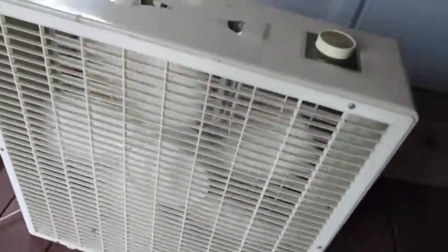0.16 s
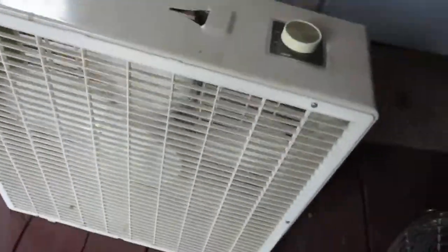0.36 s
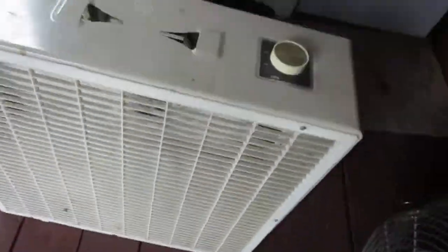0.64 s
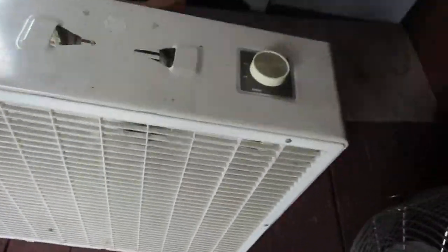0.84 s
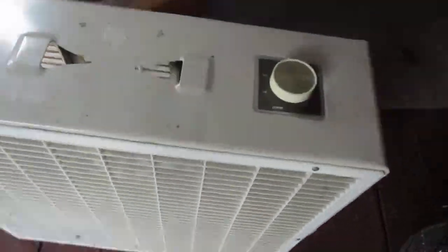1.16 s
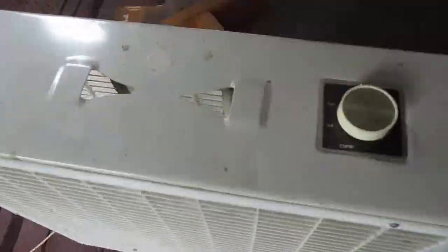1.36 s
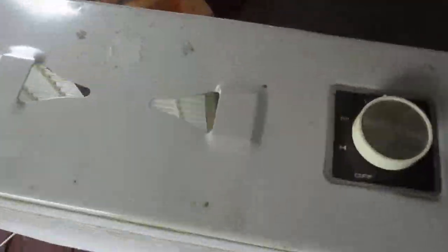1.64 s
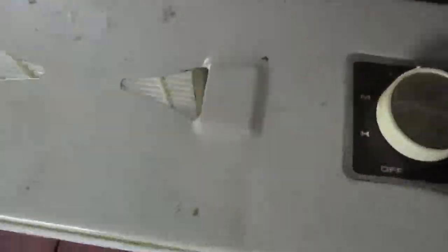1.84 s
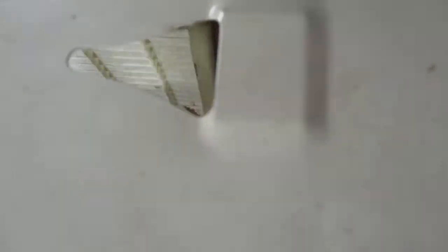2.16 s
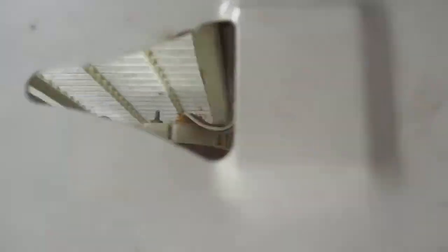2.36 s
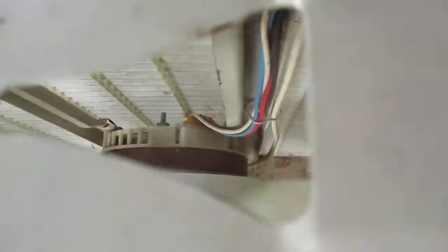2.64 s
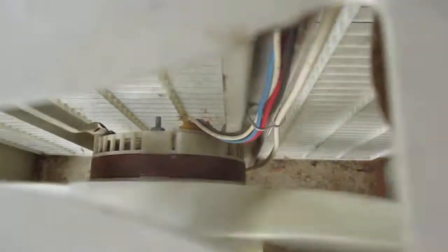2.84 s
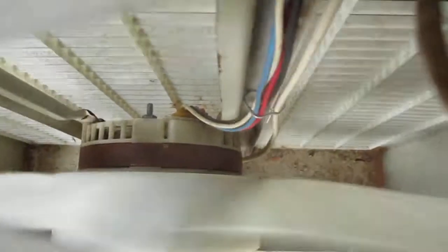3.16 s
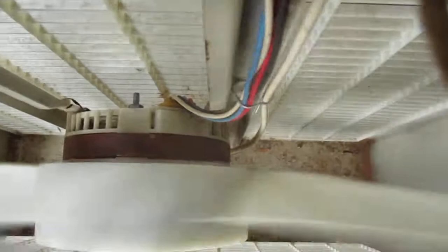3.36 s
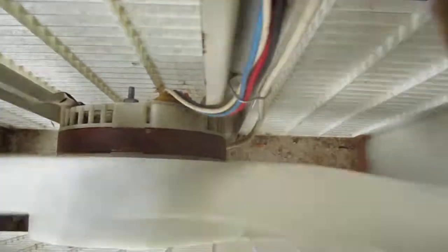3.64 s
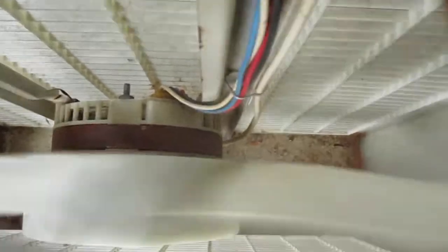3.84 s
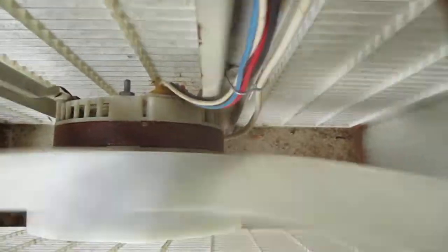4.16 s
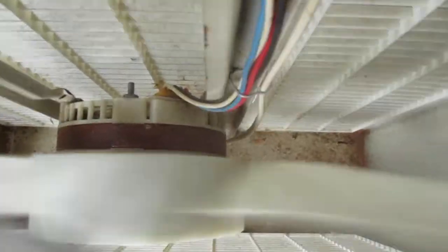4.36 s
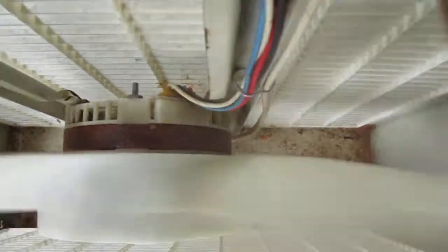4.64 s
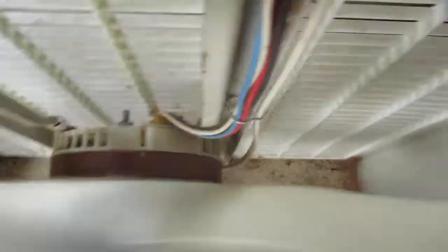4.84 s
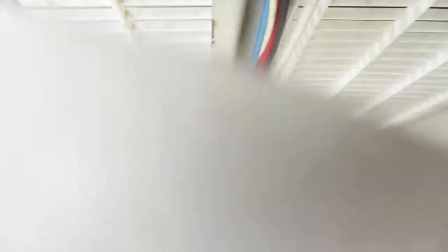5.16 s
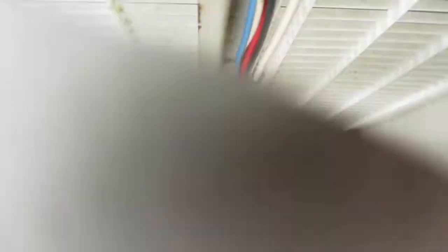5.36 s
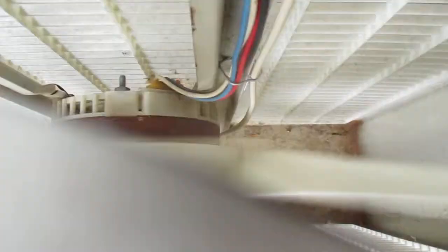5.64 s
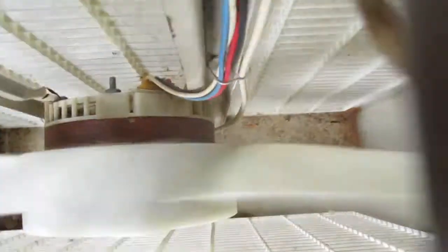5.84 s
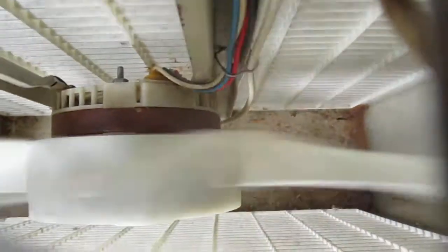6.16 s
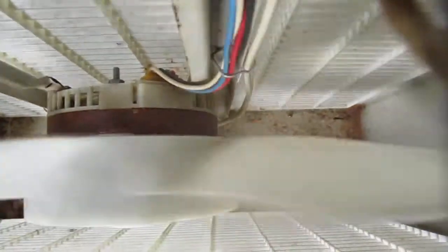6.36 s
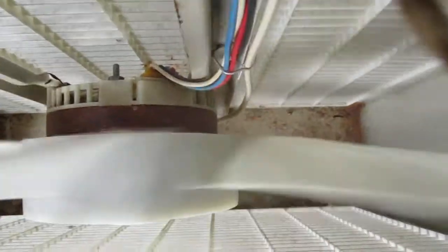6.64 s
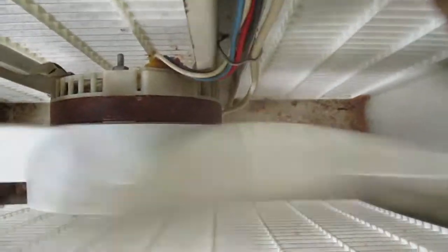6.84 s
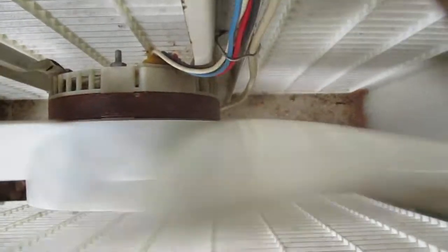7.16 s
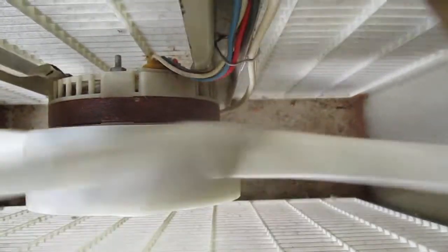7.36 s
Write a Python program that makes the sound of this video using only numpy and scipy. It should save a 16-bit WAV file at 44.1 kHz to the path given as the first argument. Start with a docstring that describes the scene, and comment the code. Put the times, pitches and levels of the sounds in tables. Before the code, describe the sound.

A box fan's buzzing hum swells as it nears, then cuts to a fading whir with light clicks and soft knocks.

```python
"""Box fan, switched off

A five-blade box fan runs indoors as a hand-held camera closes in on a handle slot in its steel case.
Mains hum beats against the blade tones, over air chopped by the blades. A hand brushes past and
switches it off: the hum stops and the rotor coasts down, with light clicks, rubs and a few knocks."""
import sys
import numpy as np
from scipy import signal
from scipy.fft import rfft, irfft, next_fast_len
from scipy.io import wavfile
from scipy.ndimage import map_coordinates

SR = 44100
rng = np.random.default_rng(int(sys.argv[2]) if len(sys.argv) > 2 else 0)


def to_wav(s):
    """Save 16-bit WAV."""
    ch = np.atleast_2d(s).T  # columns
    pcm = np.round(np.clip(ch, -1, 1) * 32767)  # PCM
    wavfile.write(sys.argv[1], SR, pcm.astype(np.int16))


N = 330309
TIME_S = np.arange(N) / SR
BLADES, FULL_PASS_HZ, MAINS_HZ, OFF_S = 5, 55.76, 60, 4.87
CLICK_LEAD_S = 0.004


def amp(db):
    """Decibels to gain."""
    return 10 ** (np.asarray(db) / 20)


def unit(x):
    """Scale to rms 1."""
    return x / np.sqrt(np.mean(x ** 2) + 1e-20)


def wobble(rate_hz):
    """Smooth random curve through Gaussian knots."""
    knots = rng.standard_normal(int(N * rate_hz / SR) + 4)
    return map_coordinates(knots, [TIME_S * rate_hz])


def filtered(x, response):
    """Apply a frequency response by FFT."""
    size = next_fast_len(len(x) + 8192)
    return irfft(rfft(x, size) * response(np.fft.rfftfreq(size, 1 / SR)), size)[:len(x)]


def resonance(f, hz, width_hz):
    """Causal resonance, gain 1 at its centre."""
    return 1j * f * width_hz / (hz * hz - f * f + 1j * f * width_hz)


def noise(spectrum):
    """Noise of rms 1, shaped by rows of f/Hz, level/dB."""
    hz, db = np.transpose(spectrum)
    colour = lambda f: amp(np.interp(np.log(f + 1), np.log(hz), db))
    return unit(filtered(rng.standard_normal(N), colour))


def add(track, start_s, sound):
    """Mix a sound into the track."""
    part = track[round(start_s * SR):][:len(sound)]
    part += sound[:len(part)]


def nearness(reach_cm, falloff):
    """Gain: 1 at the slot, a power law of distance beyond the reach."""
    # camera's path to the slot: t/s, distance/cm
    approach = [(0, 64), (.4, 61), (.85, 39), (1.45, 29.8), (2.1, 9.7), (2.4, 5.5), (2.9, 3.4), (3.4, 1.34),
                (4.5, 1.5)]
    distance_cm = np.interp(TIME_S, *np.transpose(approach))
    return (1 + (distance_cm / reach_cm) ** 2) ** (-falloff / 2)


def envelope(start_s, attack_s, hold_s, release_s):
    """Linear rise to 1, hold, exponential decay."""
    t = TIME_S - start_s
    return np.clip(t / attack_s, 0, 1) * np.exp(-np.maximum(t - attack_s - hold_s, 0) / release_s)


def motor(blade_db, hand_pass, level_db=-16, shade_db=-7, swell_db=3.5, flutter_db=3.5, stop_s=0.062):
    """Iron hums at even mains multiples until switch-off; its overtones flutter in the airflow."""
    # magnetic hum: mains multiple, relative level/dB
    harmonics = [(2, 1), (4, -22), (6, -14.5), (8, -45), (10, -24.5)]
    phase = 2 * np.pi * MAINS_HZ * TIME_S
    hum = amp(harmonics[0][1] + 0.5 * wobble(12)) * np.sin(2 * phase)
    slot_db = 0.62 * (blade_db - blade_db.max())  # overtones come out where the blade tones do
    for k, db in harmonics[1:]:
        hum += amp(db + slot_db + flutter_db * wobble(20)) * np.sin(k * phase + 0.86 * wobble(25))
    shaded_db = shade_db * nearness(reach_cm=2.47, falloff=3.1)  # right at the slot
    gain = amp(level_db + shaded_db + swell_db * hand_pass) * nearness(reach_cm=5.45, falloff=1.08)
    powered = np.clip((OFF_S - TIME_S) / stop_s + 0.5, 0, 1)
    return np.sqrt(2) * gain * powered * hum


def rotor(balance_hz=19.9, braking_per_s=0.149):
    """Blade-pass rate in Hz: steady, then slowed by air drag and bearing friction (equal at balance_hz)."""
    coast_s = np.maximum(TIME_S - OFF_S, 0)
    return balance_hz * np.tan(np.arctan(FULL_PASS_HZ / balance_hz) - braking_per_s * coast_s)


def blades(pass_hz, phase, blade_db, uneven_db=-24, waver_db=0.8, eddy_db=3, low_cut_hz=46):
    """Each passing blade sends a pressure pulse; unequal blades add weak shaft-rate harmonics."""
    # pressure pulse: blade-pass multiple, relative level/dB
    pulse = [(1, 4.5), (2, -1.5), (3, -8), (4, -16), (5, -23), (6, -35.5)]
    mic_gain = lambda hz: 1 / np.sqrt(1 + (low_cut_hz / hz) ** 4)
    eddies = wobble(30)  # inflow eddies make a pulse taller and sharper
    tones, shaft = np.zeros((2, N))
    for k, db in pulse:
        depth_db = waver_db if k == 1 else eddy_db
        tones += amp(db + depth_db * eddies) * mic_gain(k * pass_hz) * np.cos(k * phase)
    for k in range(3, 15):
        if k % BLADES:
            gain = (0.5 + rng.random()) * mic_gain(k * pass_hz / BLADES)
            shaft += gain * np.cos(k * phase / BLADES + rng.uniform(0, 2 * np.pi))
    return np.sqrt(2) * amp(blade_db) * (tones + amp(uneven_db) * shaft)


def air(phase, speed, hand_pass, inside_db=-27, grille_db=-34.5, gust_db=-21, cavity_hz=362):
    """Turbulence follows rotor speed, swells at each blade pass, rings the case and breaks on the hand."""
    # air spectra in the case, at the grille and on the hand: f/Hz, relative level/dB
    inside_spectrum = [(15, -12.5), (35, -3), (70, 4), (130, 0.5), (250, -1), (480, -6), (700, -9.5),
                       (1250, -14), (2000, -22.5), (3200, -35.5), (6000, -44), (10000, -56), (12500, -58),
                       (16000, -63)]
    grille_spectrum = [(20, -33), (60, -23), (130, -0.5), (220, 4), (320, -5.5), (450, 0), (650, -3),
                       (900, -4.5), (1300, -7), (2000, -17), (3200, -24.5), (5000, -33), (9500, -43.5),
                       (16000, -67.5)]
    gust_spectrum = [(20, -20), (60, -2), (110, 7), (300, -1), (500, -7), (900, -8.5), (1400, -16),
                     (2500, -55), (5000, -44), (10000, -58), (16000, -73)]
    chop = np.cos(phase)
    cavity = lambda f: 1 + amp(-2) * resonance(f, cavity_hz, width_hz=45)
    inside = unit(filtered(noise(inside_spectrum), cavity)) * amp(inside_db + 0.5 * chop + wobble(15))
    inside *= nearness(reach_cm=3.4, falloff=1) * speed ** 3.9
    grille = noise(grille_spectrum) * amp(grille_db + 1.16 * chop + wobble(11))
    grille *= nearness(reach_cm=24.2, falloff=0.82) * speed ** 3.86
    gust = noise(gust_spectrum) * hand_pass * amp(gust_db + 0.5 * chop)
    return inside + grille + gust


def click(peak_db, hz, t60_s, rise_s=0.00021, snap=6, shell_hz=8900, shell_db=-5):
    """Crackle and a snap ring one broad resonance and the camera's shell; low clicks are duller."""
    t = np.arange(SR // 16) / SR - CLICK_LEAD_S
    shape = np.exp(np.minimum(t, 0) / rise_s) * amp(-60 * np.maximum(t, 0) / t60_s)
    burst = rng.standard_normal(len(t)) * shape
    burst[round(CLICK_LEAD_S * SR)] += snap
    body = lambda f: resonance(f, hz, 0.58 * hz) + amp(shell_db) * resonance(f, shell_hz, width_hz=2000)
    cutoff_hz = min(2.28 * hz, 11000)
    sound = filtered(burst, lambda f: body(f) / np.sqrt(1 + (f / cutoff_hz) ** 8))
    return amp(peak_db) * sound / np.abs(sound).max()


def handling(tick_gap_s=0.11, tick_hz=3500, scatter_db=2.5):
    """Sharp clicks, and faint irregular ticks as the grip shifts."""
    # handling clicks: t/s, peak level/dB, f/Hz, t60/s
    clicks = [(0.6379, -13, 3170, .01), (0.6712, -21, 1420, 0.015), (.721, -25, 5340, 0.0049),
              (1.115, -21, 2450, 0.01), (1.753, -21, 2000, 0.01), (1.8258, -23, 3920, 0.016),
              (2.1299, -29.5, 2970, 0.023), (3.478, -10.5, 4240, .006), (4.1157, -26, 3470, 0.035),
              (4.6486, -10, 4620, 0.024), (4.6986, -16.5, 2930, 0.023), (4.716, -16.5, 4400, .016),
              (4.9274, -19.5, 2490, .016), (5.1582, -22, 4170, 0.01), (5.2215, -29.5, 4430, .014),
              (5.3268, -17, 2600, .012), (5.4362, -19, 2300, .009), (5.518, -22.5, 4640, .022),
              (6.4122, -24, 1380, 0.0099), (6.835, -31.5, 1900, 0.018)]
    # grip shifts: start/s, end/s, typical peak level/dB
    grip_shifts = [(0.071, .34, -36), (.98, 1.08, -32), (1.783, 2.0, -34), (4.781, 4.98, -28.5)]
    out = np.zeros(N)
    for at_s, db, hz, t60_s in clicks:
        add(out, at_s - CLICK_LEAD_S, click(db, hz, t60_s))
    for start_s, end_s, db in grip_shifts:
        for at_s in np.arange(start_s + tick_gap_s / 2, end_s, tick_gap_s):
            late, strong, high = rng.standard_normal(3)
            tick = click(db + scatter_db * strong, tick_hz * np.exp(0.25 * high), t60_s=0.012)
            add(out, abs(at_s + 0.2 * tick_gap_s * late), tick)
    return out


def knocks(crack_db=3, crack_t60_s=0.035, crack_hz=3000, contact_s=0.00037, scatter_db=1.5):
    """Each knock builds over a brief contact and rings the case; soft ones lose the high modes."""
    # modes of the steel case and its air space: f/Hz, relative level/dB, t60/s
    modes = [(133, 1, 0.073), (219, -4, 0.037), (362.5, 4.5, 0.16), (399, 5, 0.065), (562, 7.5, 0.021),
             (693, 4, 0.025), (961, 2.5, 0.026), (1100, 4, 0.012), (1630, 3, 0.015), (2310, 12.5, 0.01),
             (2560, -6, 0.026), (3730, -8, .015)]
    # blows on the case: t/s, gain/dB, cutoff/Hz
    blows = [(4.827, -12.5, 500), (6.281, -21.5, 150), (6.711, -33.5, 248), (6.8975, -20, 2500),
             (6.9015, -20, 2000), (7.1998, -38.5, 1800)]
    out, t = np.zeros(N), np.arange(SR // 4) / SR
    for at_s, db, cutoff_hz in blows:
        ring = np.zeros(len(t))
        for hz, mode_db, t60_s in modes:
            struck_db = mode_db + scatter_db * rng.standard_normal()
            ring += amp(struck_db - 60 * t / t60_s) * np.sin(2 * np.pi * hz * t)
        crack = amp(crack_db - 60 * t / crack_t60_s) * rng.standard_normal(len(t))
        crack = filtered(crack, lambda f: 2 / (1 + 1j * f / crack_hz) ** 2)
        blow = (ring + crack) * (1 - np.exp(-t / contact_s))
        add(out, at_s, amp(db) * filtered(blow, lambda f: 1 / (1 + 1j * f / cutoff_hz)) / 2)
    return out


def drag(level_db=-29.5, judder_db=2.5):
    """The hand catches on the steel panel and judders along it, ever more lightly."""
    # panel friction spectrum: f/Hz, relative level/dB
    panel_spectrum = [(150, -3), (400, -8), (900, 3), (1400, 2), (2300, -4), (3500, -19), (8000, -29),
                      (16000, -53.5)]
    pressure = envelope(start_s=4.655, attack_s=0.012, hold_s=0.088, release_s=0.069)
    return amp(level_db) * pressure * unit(noise(panel_spectrum) * amp(judder_db * wobble(250)))


def rubs(grain_db=4, squeak_db=4):
    """Skin sticks and slips: each stroke is a swell of fine grains around a squeak."""
    # skin friction spectrum: f/Hz, relative level/dB
    skin_spectrum = [(200, -7), (1200, 9.5), (2500, 6.5), (4300, 0.5), (5900, -1.5), (7500, -6),
                     (9500, -7.5), (11000, -8.5), (14000, -14), (16000, -19.5)]
    # finger strokes on camera and case: centre/s, width/s, level/dB, squeak f/Hz
    strokes = [(0.668, 0.052, -52, 8500), (1.102, 0.11, -52, 9100), (1.267, 0.035, -49.5, 9200),
               (1.69, 0.026, -45.5, 8800), (1.761, .029, -43.5, 9000), (2.246, 0.043, -48.5, 4940),
               (4.515, 0.026, -41, 6170), (4.652, .017, -30.5, 5660), (4.72, .069, -37, 6140),
               (4.87, 0.18, -41, 7150), (5.34, .027, -43.5, 4500), (5.442, 0.067, -43, 4500),
               (5.512, 0.023, -40, 6300), (5.772, .05, -49, 4460)]
    out = np.zeros(N)
    grains = noise(skin_spectrum) * amp(grain_db * wobble(350))
    for centre_s, width_s, db, hz in strokes:
        start, stop = round((centre_s - 2 * width_s) * SR), round((centre_s + 2 * width_s) * SR)
        squeak = lambda f: 1 + amp(squeak_db) * resonance(f, hz, 0.16 * hz)
        stroke = unit(filtered(grains[start:stop], squeak))
        swell = np.exp(-2 * np.linspace(-2, 2, len(stroke)) ** 2)
        add(out, start / SR, amp(db) * swell * stroke)
    return out


def whistles(glide_share=0.18):
    """A faint thin whistle, and later a brief high squeak, each hold, glide to a new pitch halfway through and
    level off."""
    # a whistle and a squeak: start/s, end/s, first f/Hz, last f/Hz, peak level/dB, relative pitch waver
    glides = [(2.561, 3.17, 3600, 4250, -56, 0.0034), (5.06, 5.112, 12000, 11700, -53, .025)]
    out = np.zeros(N)
    for start_s, end_s, from_hz, to_hz, db, waver in glides:
        progress = np.clip((TIME_S - start_s) / (end_s - start_s), 0, 1)
        glide = (1 + np.tanh((progress - 0.5) / glide_share)) / 2
        hz = (from_hz + (to_hz - from_hz) * glide) * (1 + waver * wobble(400))
        swell = np.sqrt(np.abs(np.sin(np.pi * progress)))
        out += amp(db) * swell * np.sin(2 * np.pi * np.cumsum(hz) / SR)
    return out


def reflections(x, t60_s, wet_db, low_hz=350, high_hz=4500):
    """Nearby surfaces return a short tail, strongest in the midrange."""
    t = np.arange(SR // 3) / SR
    colour = lambda f: 1j * f / (low_hz + 1j * f) / (1 + 1j * f / high_hz)
    tail = filtered(rng.standard_normal(len(t)) * amp(-60 * t / t60_s), colour)
    return amp(wet_db) * signal.fftconvolve(x, tail / np.linalg.norm(tail))[:N]


def background(room_db=-47.5, hiss_db=-56.5, creep_db=12.5, creep_s=1.6, whine_hz=11800, whine_db=-21):
    """Room noise; a high hiss and a faint whine creep up to a steady level."""
    # room and hiss spectra: f/Hz, relative level/dB
    room_spectrum = [(20, 12.5), (100, 21.5), (300, 11.5), (380, 12.5), (600, 7), (1200, 4), (2000, -9.5),
                     (4000, -22), (8000, -23.5), (16000, -36)]
    hiss_spectrum = [(500, -7.5), (3000, -3.5), (6200, -7), (6900, 1.5), (7450, 3), (8100, -8),
                     (10000, -11.5), (13000, -17), (16000, -22)]
    whine = amp(whine_db) * np.sin(2 * np.pi * whine_hz * TIME_S + 0.9 * wobble(70))
    hiss_gain = amp(hiss_db - creep_db * np.exp(-TIME_S / creep_s))
    return amp(room_db) * noise(room_spectrum) + hiss_gain * (noise(hiss_spectrum) + whine)


def scene():
    """Fan, hand and room at one microphone."""
    pass_hz = rotor()
    phase = 2 * np.pi * np.cumsum(pass_hz) / SR
    speed = pass_hz / FULL_PASS_HZ
    # blade pulses carry only a short way and weaken steeply as the rotor slows
    blade_db = -24 + 20 * np.log10(nearness(reach_cm=4.3, falloff=2.5) * speed ** 2.89)
    # the hand slides over the case to the switch
    hand_pass = envelope(start_s=4.62, attack_s=0.13, hold_s=0.14, release_s=0.062)
    tones = motor(blade_db, hand_pass) + blades(pass_hz, phase, blade_db)
    airflow = air(phase, speed, hand_pass)
    airflow += reflections(airflow, t60_s=0.13, wet_db=-16)  # off case and floor
    fan = tones + airflow + whistles()
    hand = handling() + rubs() + drag() + knocks()
    hand += reflections(hand, t60_s=0.054, wet_db=-17)
    return (fan + hand + background())[None]


def record(dry, top_hz=15900):
    """Brick-wall low-pass."""
    return filtered(dry[0], lambda f: f < top_hz)[None]


dry = scene()
out = record(dry)
to_wav(out)
```